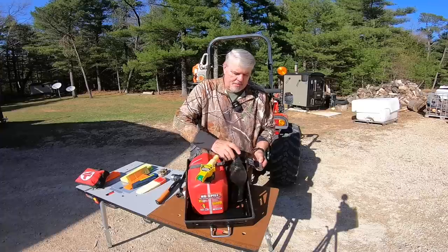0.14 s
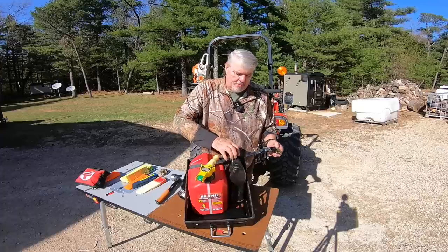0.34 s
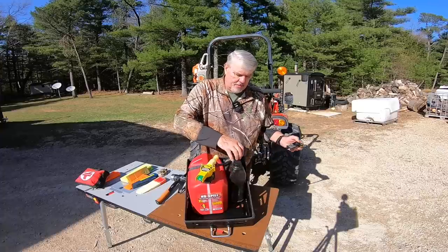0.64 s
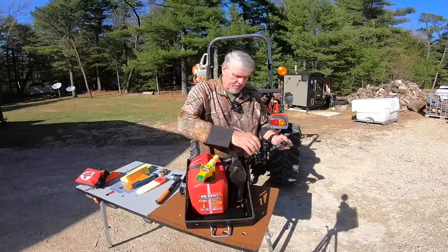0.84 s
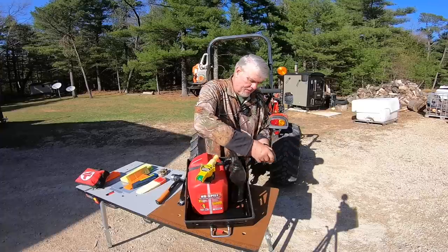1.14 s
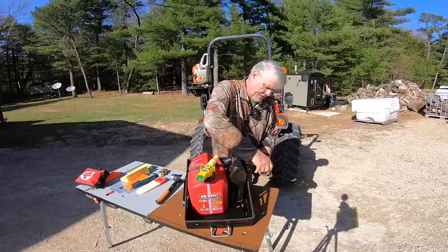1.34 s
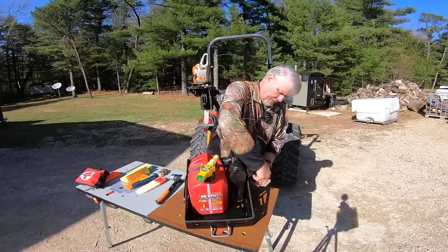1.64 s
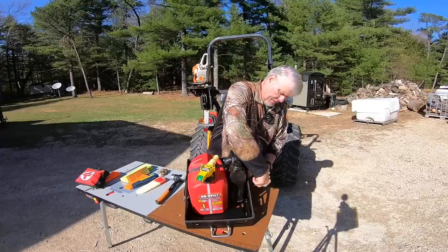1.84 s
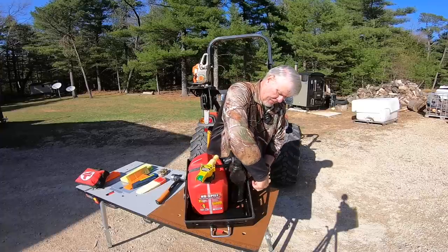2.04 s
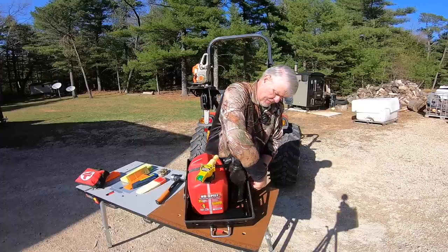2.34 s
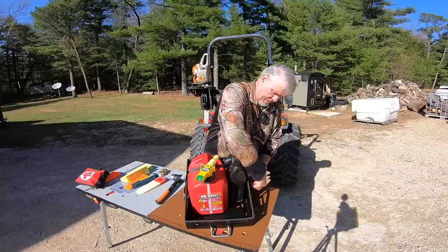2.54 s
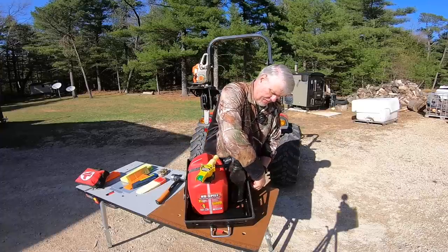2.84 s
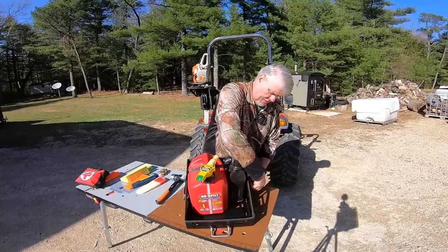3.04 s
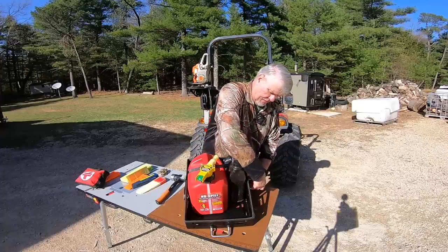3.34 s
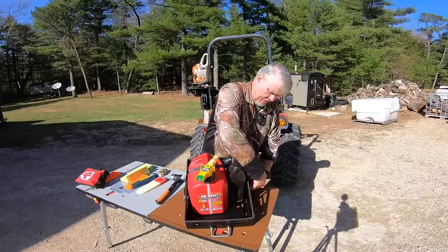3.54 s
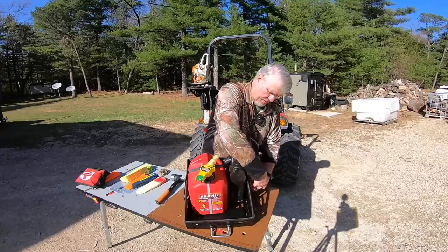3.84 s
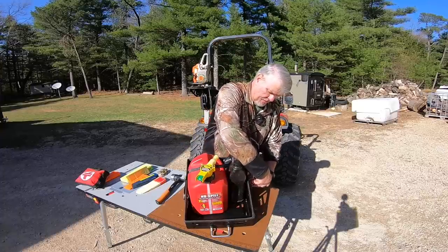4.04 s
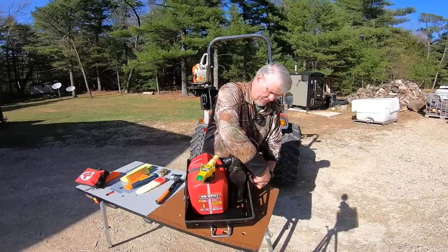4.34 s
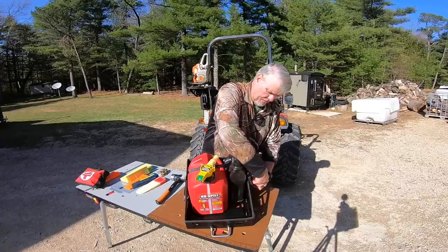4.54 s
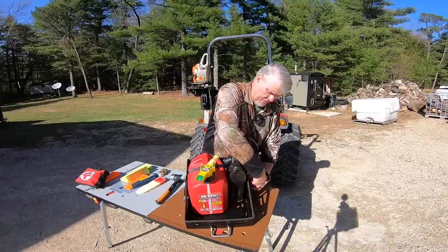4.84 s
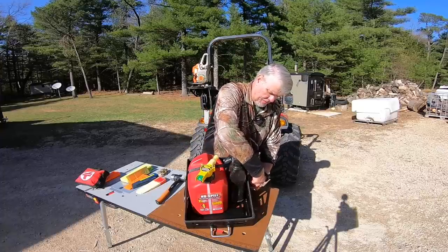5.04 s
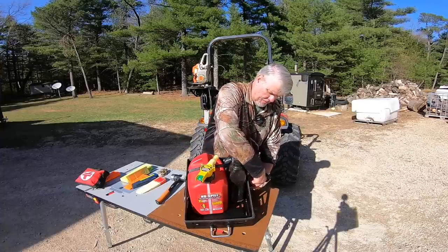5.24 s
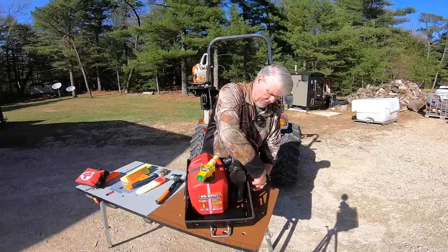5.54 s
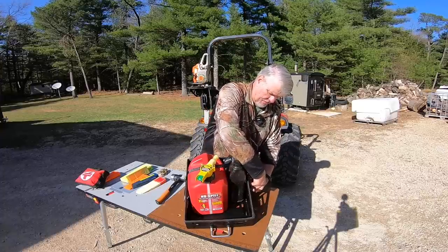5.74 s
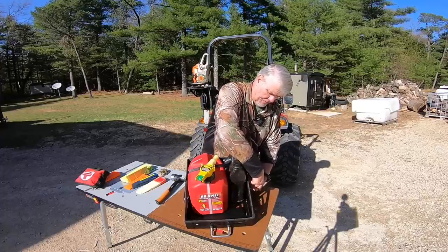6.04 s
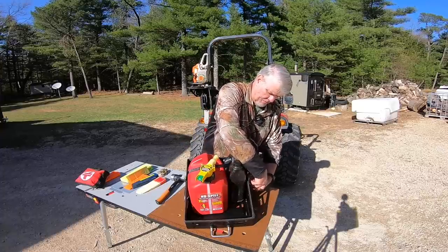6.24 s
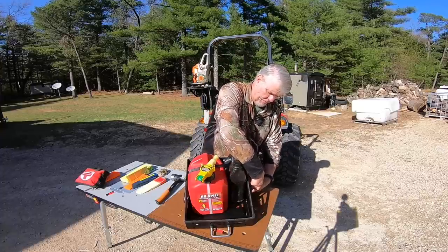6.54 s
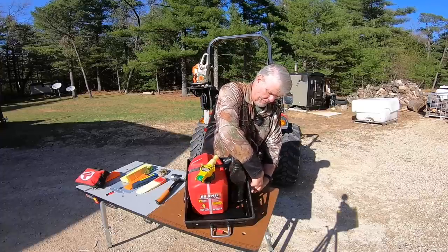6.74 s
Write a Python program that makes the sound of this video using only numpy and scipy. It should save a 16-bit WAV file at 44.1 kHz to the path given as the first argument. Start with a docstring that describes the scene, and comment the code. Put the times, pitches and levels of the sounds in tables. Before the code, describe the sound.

Loose buckle parts tick and sleeves rub before hard steel clacks, short drags and webbing slides ring out in quickening bursts in open air.

```python
"""Outdoors, a ratchet strap is fitted over a plastic fuel can that stands in a steel carrier tray.
First a hand bumps the can, as sleeves rub and small parts tick over faint open air and hiss.
Two dry taps lead to a cluster of knocks and drags on the tray; more taps and sliding webbing follow.
Then the spring catch snaps, webbing slides again and a long, dense run of knocks rings to the end.
Struck steel is damped modes plus decaying noise: hard contacts clack, soft ones clunk; cloth is noise."""
import sys
import numpy as np
from scipy import signal
from scipy.fft import rfft, irfft, next_fast_len
from scipy.io import wavfile
from scipy.ndimage import map_coordinates

SR = 44100
rng = np.random.default_rng(int(sys.argv[2]) if len(sys.argv) > 2 else 0)


def pcm_store(signal):
    """Save signal as 16-bit PCM."""
    levels = np.round(np.clip(np.atleast_2d(signal), -1, 1) * 32767)
    wavfile.write(sys.argv[1], SR, levels.astype(np.int16).T)


N = 304245
T = np.arange(int(.6 * SR)) / SR  # time axis of one single sound (s)

# Buckle and hook knock on the tray: start_s, level_db, hardness_db,
# spot_hz (pitch of the struck spot), hook_db (hook ring relative to level_db)
CONTACTS = [(0.114, -40, 4.5, 1080, -27), (0.594, -36.5, 5, 2420, -20), (0.598, -31.5, -1, 1730, -12),
            (0.684, -40, 0.5, 2330, -14), (0.931, -43.5, -6, 1830, -12), (2.047, -31, -4, 2490, -22),
            (2.246, -28, 0, 2480, -4), (2.358, -39.5, 3.5, 2964, -2.5), (2.459, -26.5, -4.5, 2010, -12),
            (2.535, -35, 11, 3160, -8), (2.584, -35, -7.5, 1760, -9), (2.617, -29.5, -6, 2160, -10.5),
            (2.627, -32, -8, 1250, -28), (2.699, -36.5, -10.5, 2190, -41), (3.319, -44, -3.5, 1840, -7.5),
            (3.825, -36, 3.5, 1670, -22), (3.833, -31, 5, 3067, -3), (4.681, -21.5, 5.5, 2516, -35),
            (4.73, -45, -2, 1750, -25), (4.817, -42.5, -17.5, 1750, -14), (4.889, -33.5, -5.5, 1230, -15),
            (4.924, -43.5, -5.5, 2990, -14), (4.977, -48.5, -12, 1750, -13), (5.01, -32, -6, 1700, -13),
            (5.026, -23, 1, 2140, -31), (5.03, -24, 1, 2920, -25), (5.232, -44, 11.5, 1800, -16.5),
            (5.377, -52, -25.5, 1200, -12), (5.537, -25.5, 1.5, 2270, -15), (5.666, -40, 4.5, 1730, -9),
            (5.781, -27.5, 4, 3020, -13.5), (5.873, -40.5, -6, 2150, -23), (5.955, -43, -0.5, 3000, -26),
            (6.116, -35.5, 3, 2374, -7), (6.382, -26, 0.5, 3044, -7), (6.612, -32.5, -4.5, 2200, -31),
            (6.672, -44, -8, 1200, -28), (6.818, -33.5, 1, 2970, -19)]
# Hook and buckle drag over the tray: start_s, end_s, level_db, hardness_db
DRAGS = [(0, 0.011, -36, 5), (.057, 0.133, -42, 7.5), (0.575, 0.628, -40.5, -6), (0.685, 0.73, -39.5, 2.5),
         (.92, .955, -46, 5), (2.159, 2.235, -41, -0.5), (2.557, 2.674, -38, -1.5), (2.627, 2.722, -46, -5),
         (3.809, 3.858, -41, 9), (4.733, 4.84, -41.5, 2), (4.961, 5.11, -43, -7), (5.512, 5.545, -43, -9),
         (5.593, 5.675, -42, -6.5), (5.753, 5.792, -37.5, -2), (5.883, 5.998, -47.5, -0.5),
         (6.558, 6.682, -36.5, -2), (6.615, 6.686, -27.5, -2)]
# The spring catch snaps: start_s, level_db
CATCH_SNAPS = [(3.8397, -28), (5.141, -69), (5.231, -53)]
# Dry taps on steel that the fingers hold still: start_s, level_db, pitch_hz
TAPS = [(1.238, -54, 540), (1.565, -50.5, 600), (2.921, -55, 1740), (3.074, -54, 1530)]
# Loose bars of the frame sing on: start_s, pitch_hz, level_db, t60_s
BARS = [(.685, 959, -32, 0.29), (4.683, 920, -55, 0.21), (4.682, 1800, -41, 0.25), (5.031, 1604, -50, 0.67),
        (6.65, 870, -46, 0.79)]
# Loose parts of the buckle tick: start_s, level_db
TICKS = [(0.058, -46.5), (0.175, -48.5), (0.187, -53), (0.314, -48.5), (0.407, -52), (0.524, -57),
         (0.789, -51), (0.893, -53), (.995, -55.5), (1.013, -53), (3.221, -56), (3.423, -55.5), (4.47, -77),
         (5.343, -60.5), (6.542, -58)]
# A hand bumps the can: start_s, level_db
BUMPS = [(.001, -40.5), (0.058, -43.5), (0.111, -31.5), (.176, -39), (0.602, -51), (0.933, -49.5)]
# Webbing slides and is brushed: start_s, end_s, level_db
SLIDES = [(0, 0.013, -36), (0.787, 0.853, -56), (1.367, 1.472, -52.5), (3.205, 3.454, -59.5),
          (4.286, 4.36, -62), (4.457, 4.487, -52), (4.7, 4.823, -71), (6.598, 6.676, -53.5)]
# Thin, wavering high tones, two short squeaks and a faint breathy one: start_s, end_s, pitch_hz, level_db
THIN_TONES = [(0.023, 0.039, 4100, -38), (1.762, 1.84, 7250, -68), (5.13, 5.3, 4500, -67.5)]
# Movement of the arms, heard as rubbing cloth: time_s, level_db
ARM_MOVEMENT = [(0, -51), (.25, -63), (.45, -61.5), (1.1, -67), (1.8, -68.5), (2.2, -73.5), (2.6, -65),
                (2.9, -79), (3.4, -70.5), (4.58, -84), (5.2, -71), (6.5, -77), (6.9, -71.5)]

# Modes of each struck body. Rim: pitch_hz, level_db (relative within the body), t60_s
RIM_MODES = [(986, -6.5, 0.24), (1101, -13.5, 0.3), (1156, 1, 0.093), (1206, -2.5, 0.065), (1311, -3, 0.15),
             (1340, -19, 0.12), (1457, -4.5, 0.097), (1520, 1.5, 0.11), (1622, -0.5, 0.085),
             (1682, -4, 0.12), (1753, 2, 0.11), (1860, -0.5, 0.077), (2273, -10.5, 0.087),
             (2730, -33, 0.06), (3060, -24, 0.17), (2950, -23, 0.049), (3950, -42.5, 0.12)]
# First slap of the rim: pitch_hz, level_db (relative), t60_s
RIM_SLAP_MODES = [(1078, -10, 0.084), (1190, -3.5, 0.064), (1429, 0.5, 0.028), (1760, 5, 0.015),
                  (1728, 5, 0.028)]
# Buckle: pitch_hz, level_db (relative), t60_s
BUCKLE_MODES = [(2178, -2.5, 0.074), (2390, 7, 0.031), (2710, -8.5, 0.077), (2940, -3.5, 0.062),
                (3320, -19, 0.064), (3635, -2, 0.04), (4126, -13.5, 0.077), (4620, -7, 0.03),
                (6020, -14.5, 0.028)]
# Tray floor: pitch_hz, level_db (relative), t60_s
TRAY_MODES = [(209.5, -18.5, 0.35), (260, -11.5, 0.26), (317.1, -8, 0.34), (355.3, -10, 0.37),
              (388, -3, 0.2), (438, -8.5, 0.15), (494, -4, 0.28), (530, -4, 0.16), (560, -0.5, 0.23),
              (594.6, -0.5, 0.23), (621.3, -12, 0.19), (666.5, -6, 0.17), (698, -10.5, 0.18), (750, 0, 0.2),
              (791, -9.5, 0.096)]
# Hook: pitch_hz, level_db (relative), t60_s
HOOK_MODES = [(1183, -8, 0.31), (1463, -6, 0.2), (1498, 1, 0.29), (1597, -5, 0.2), (1703, -6, 0.21)]
# Small spring catch: pitch_hz, level_db (relative), t60_s
CATCH_MODES = [(5830, 3.5, .024), (7370, -4.5, 0.026), (8290, 2, 0.022), (11800, -11, .036),
               (13700, -7, .022), (14350, -12, 0.05)]
# Hollow plastic can: pitch_hz, level_db (relative), t60_s
CAN_MODES = [(119.5, -9, 0.21), (157.7, -4.5, 0.24), (199.7, -1.5, 0.32), (237, -3.5, 0.17),
             (286.5, -0.5, 0.15), (332, 3, 0.1), (430, -2.5, 0.097), (521, -2.5, .1), (615, 1, 0.078),
             (827, -9, 0.065)]

# Noise colours, relative within each. Wash behind the rim modes: frequency_hz, level_db (per Hz)
RIM_WASH = [(550, -42.5), (900, -31.5), (1170, 6), (1750, -4.5), (2050, -3), (3100, -19.5), (5000, -52)]
# Wash behind the tray floor modes: frequency_hz, level_db (per Hz)
TRAY_WASH = [(60, -47), (140, -13), (330, -4.5), (580, -0.5), (760, -4), (950, 0.5), (1400, -56.5)]
# Crack of the buckle, also grit of drags and click of taps: frequency_hz, level_db (per Hz)
CRACK_COLOUR = [(900, -34), (2100, -6.5), (2400, -7), (3150, 4), (3600, -10.5), (5000, -11.5),
                (6200, -18.5), (7500, -26), (12000, -53)]
# Bright edge of a contact or snap: frequency_hz, level_db (per Hz)
EDGE_COLOUR = [(2500, -12.5), (5500, 2), (7000, -1.5), (8400, -9), (9500, -0.5), (13000, -5), (16000, -7.5)]
# Weave of the webbing: frequency_hz, level_db (per Hz)
WEAVE_COLOUR = [(500, -2), (1800, -2), (4200, 1.5), (6500, -5.5), (9000, -12), (14000, -22.5),
                (16000, -26.5)]
# Sleeve cloth: frequency_hz, level_db (per Hz)
CLOTH_COLOUR = [(71, -15), (120, -6), (284, -2), (473, -7.5), (592, -7), (1010, -13), (1750, -10),
                (2590, -14), (3240, -13.5), (7200, -22.5), (16000, -44)]
# Open air: frequency_hz, level_db (per Hz)
AIR_COLOUR = [(20, -16), (45, -7), (75, 1.5), (110, 2), (200, -0.5), (400, 0), (780, -2.5), (1260, -10),
              (2320, -18.5), (4800, -18.5), (8900, -31.5), (14700, -29.5), (16000, -44)]
# Hiss of each channel: frequency_hz, level_db (per Hz)
HISS_COLOUR = [(100, 14.5), (1000, -7.5), (4000, -6.5), (8000, 1), (16000, -1)]

CLACK_DB, CLUNK_DB, EDGE_DB = -7.5, -9, -35  # buckle, tray floor, bright edge: vs rim at hardness 0
CLUNK_LOSS, EDGE_GAIN = 0.51, 0.55  # dB that the clunk loses and the edge gains per dB of hardness
SPOT_DB, SPOT_T60_S = -2.5, 0.041  # the struck spot's own tone, relative to the buckle; ring time
DRAG_PEAK, SLIDE_PEAK = 0.31, 0.39  # share of its length before a drag, or a slide or thin tone, peaks
DRAG_CHATTER_DB = -11.5  # buckle chatter of a drag, relative to the rim at hardness 0
TAP_T60_S, TAP_FLESH_DB = 0.012, -4.5  # ring time; low knock of the finger, relative to the tap's tone
TICK_TILT_DB = 14  # brightness per octave, before its random spread
TICK_RIM_DB, TICK_TRAY_DB, TICK_EDGE_DB = -1.5, -5.5, -16.5  # what rings along, relative to the buckle
JINGLES_PER_S, JINGLE_DB = 4, 0.5  # fainter ticks: rate; level over the arm movement
CLOTH_DB = 8  # cloth rustle over the arm movement
TOP_HZ = 16100  # upper band limit


def amp(db):
    """Decibels to a linear gain."""
    return 10 ** (np.asarray(db) / 20)


def unit(x):
    """Scaled to rms 1."""
    return x / np.sqrt(np.mean(x ** 2) + 1e-20)


def opening(x, count):
    """Scaled to rms 1 over its first count milliseconds."""
    return x / np.sqrt(np.mean(x[:count * SR // 1000] ** 2) + 1e-20)


def fade(t60):
    """A decay of 60 dB in t60 seconds."""
    return np.exp(-np.log(1000) * T / t60)


def swell(seconds):
    """A vibration that needs a moment to build up; seconds is its time constant."""
    return 1 - np.exp(-T / seconds)


def sine(hz):
    """A steady pure tone."""
    return np.sin(2 * np.pi * hz * T)


def noise(colour, size):
    """Noise of rms 1, coloured by a frequency and level table."""
    m = next_fast_len(size)
    f, db = np.transpose(colour)
    bins_hz = np.fft.rfftfreq(m, 1 / SR)
    gain = amp(np.interp(np.log(bins_hz + 1), np.log(f + 1), db))
    return unit(irfft(rfft(rng.standard_normal(m)) * gain, m)[:size])


def wobble(rate):
    """A smooth random curve, rate knots a second."""
    knots = rng.standard_normal(int(N * rate / SR) + 4)
    return map_coordinates(knots, [np.arange(N) * rate / SR])


def ring(modes, scatter_db, detune):
    """Damped modes; each blow gives them new strengths, signs and slight detuning."""
    total = np.zeros(len(T))
    for hz, db, t60 in modes:
        strength, pitch, sign = rng.standard_normal(3)
        level = np.sign(sign) * amp(db + scatter_db * strength)
        total += level * fade(t60) * sine(hz * (1 + detune * pitch))
    return opening(total, count=10)


def tilt_highs(modes, tilt_db):
    """Tilts the levels of the modes above 2 kHz by tilt_db an octave."""
    return [(hz, db + tilt_db * np.log2(max(hz, 2000) / 2000), *rest) for hz, db, *rest in modes]


def stroke(length, peak_share, edge_db):
    """A level that rises to a peak, eases off and is let go."""
    release = np.exp(-np.maximum(T - length, 0) / .008)
    peak_s = length * np.clip(peak_share, .05, .95)
    return amp(np.interp(T, [0, peak_s, length], [edge_db, 0, edge_db])) * release


def add(track, s, sound):
    """Lay a sound on the track at time s."""
    start = min(N, max(0, round(s * SR)))
    track[start:start + len(sound)] += sound[:N - start]


def contacts():
    """Every knock rings the rim; the harder it is, the more it clacks and the less the tray clunks."""
    out = np.zeros(N)
    for s, db, hardness_db, spot_hz, hook_db in CONTACTS:
        hook = amp(hook_db) * ring(HOOK_MODES, scatter_db=2, detune=.002)
        spot = opening(sine(spot_hz) * fade(SPOT_T60_S), count=10)
        clack = amp(CLACK_DB + hardness_db) * (buckle(tilt_db=-1.0) + amp(SPOT_DB) * spot)
        clunk = amp(CLUNK_DB - CLUNK_LOSS * hardness_db) * tray()
        edge = amp(EDGE_DB + EDGE_GAIN * hardness_db) * snap()
        add(out, s, amp(db) * (rim() + clack + clunk + edge + hook))
    return out


def rim():
    """The rim slaps where it is hit, while many close modes ring on over a wash."""
    slap = ring(RIM_SLAP_MODES, scatter_db=9.0, detune=0.028)
    tones = amp(-2.5) * ring(RIM_MODES, scatter_db=3, detune=0.0024)
    wash = amp(-7.5) * noise(RIM_WASH, size=len(T)) * fade(0.15)
    return opening((slap + tones + wash) * swell(0.00062), count=10)


def buckle(tilt_db):
    """The hand-damped buckle gives a dry clack; its loose parts buzz briefly."""
    buzz_fade = amp(-14.0) * fade(0.13)
    crack = noise(CRACK_COLOUR, size=len(T)) * (fade(0.038) + buzz_fade)
    tones = ring(tilt_highs(BUCKLE_MODES, tilt_db), scatter_db=2, detune=0.0228)
    return opening((tones + crack) * swell(0.00046), count=10)


def tray():
    """The loaded floor of the tray builds up slowly and answers with a hollow clunk."""
    tones = ring(TRAY_MODES, scatter_db=3.5, detune=0.0075)
    wash = amp(-3.5) * noise(TRAY_WASH, size=len(T)) * fade(0.21)
    return opening((tones + wash) * swell(0.0057), count=30)


def snap():
    """A hard edge of bright noise pings the short modes of the spring catch."""
    edge = noise(EDGE_COLOUR, size=len(T)) * (fade(0.025) + amp(-35.5) * fade(0.26))
    ping = ring(CATCH_MODES, scatter_db=2, detune=.005)
    return opening((opening(edge, count=10) + amp(-2.5) * ping) * swell(0.001), count=10)


def drags(slips_per_s=420, uneven_db=4.0):
    """Stick and slip: tiny irregular blows on the same steel, gritty and chattering when hard."""
    out = np.zeros(N)
    for start, end, db, hardness_db in DRAGS:
        force = stroke(end - start, DRAG_PEAK, edge_db=-17)
        slips = rng.random(len(T)) < slips_per_s / SR
        blows = slips * amp(uneven_db * rng.standard_normal(len(T))) * force
        clunk = amp(-6.0 - CLUNK_LOSS * hardness_db) * tray()
        chatter = amp(DRAG_CHATTER_DB + hardness_db) * buckle(tilt_db=6)
        sound = signal.fftconvolve(blows, rim() + clunk + chatter)[:len(T)]
        # the ringing carries the same energy as the force curve
        sound *= np.linalg.norm(force) / (np.linalg.norm(sound) + 1e-12)
        grit = amp(-23 + hardness_db) * force * noise(CRACK_COLOUR, size=len(T))
        add(out, start, amp(db) * (sound + grit))
    return out


def catch(clunk_db=-21):
    """The spring catch snaps shut and jolts the tray a little."""
    out = np.zeros(N)
    for s, db in CATCH_SNAPS:
        add(out, s, amp(db) * (snap() + amp(clunk_db) * tray()))
    return out


def taps(flesh_hz=420, click_db=-9):
    """Steel held in the fingers hardly rings: a tap is over in a few milliseconds."""
    out = np.zeros(N)
    for s, db, hz in TAPS:
        tone = sine(hz) + amp(TAP_FLESH_DB) * sine(flesh_hz)
        click = amp(click_db) * noise(CRACK_COLOUR, size=len(T))
        add(out, s, amp(db) * opening((tone + click) * fade(TAP_T60_S), count=10))
    return out


def bars():
    """Bars that are left free keep one clear tone after a knock."""
    out = np.zeros(N)
    for s, hz, db, t60 in BARS:
        add(out, s, amp(db) * sine(hz) * fade(t60) * swell(0.002))
    return out


def movement(s):
    """How briskly the arms move at time s, in dB."""
    return np.interp(s, *np.transpose(ARM_MOVEMENT))


def ticks():
    """Loose buckle parts tick brightly; fainter random ticks follow the strength of the arm movement."""
    out = np.zeros(N)
    times = rng.uniform(0, N / SR, round(JINGLES_PER_S * N / SR))
    levels = movement(times) + JINGLE_DB + 2 * rng.standard_normal(len(times))
    for s, db in [*TICKS, *zip(times, levels)]:
        along = amp(TICK_RIM_DB) * rim() + amp(TICK_TRAY_DB) * tray() + amp(TICK_EDGE_DB) * snap()
        tilt_db = TICK_TILT_DB + rng.uniform(-9, 4.8)
        add(out, s, amp(db) * (buckle(tilt_db) + along))
    return out


def can():
    """The hollow plastic can thumps under a soft hand."""
    out = np.zeros(N)
    for s, db in BUMPS:
        thump = ring(CAN_MODES, scatter_db=3.5, detune=0.02) * swell(0.0027)
        add(out, s, amp(db) * opening(thump, count=30))
    return out


def webbing():
    """The weave zips over an edge in fine, bright catches."""
    out = np.zeros(N)
    for start, end, db in SLIDES:
        pressure = stroke(end - start, SLIDE_PEAK, edge_db=-12.5)
        add(out, start, amp(db) * pressure * noise(WEAVE_COLOUR, size=len(T)))
    catches = unit(amp(2.5 * wobble(900)))
    return out * catches


def thin_tones(waver=0.023):
    """Thin high tones of randomly wavering pitch: two short squeaks and a faint breathy one."""
    out = np.zeros(N)
    for start, end, hz, db in THIN_TONES:
        pitch_hz = hz * (1 + waver * wobble(480)[:len(T)])
        tone = np.sin(2 * np.pi * np.cumsum(pitch_hz) / SR)
        add(out, start, amp(db) * stroke(end - start, SLIDE_PEAK, edge_db=-11) * tone)
    return out


def sleeves():
    """Cloth rubs in fine uneven catches, louder the more briskly the arms move."""
    grain = unit(amp(2.7 * wobble(45) + 1.73 * wobble(700)))
    return amp(movement(np.arange(N) / SR) + CLOTH_DB) * grain * noise(CLOTH_COLOUR, size=N)


def air():
    """Faint wind in distant trees: coloured noise whose level drifts slightly."""
    return amp(-63.5 + 0.27 * wobble(3.03)) * noise(AIR_COLOUR, size=N)


def scene():
    """One microphone feeds both channels."""
    steel = contacts() + drags() + catch() + taps() + bars() + ticks()
    mono = steel + can() + webbing() + thin_tones() + sleeves() + air()
    return np.array([mono, mono])


def record(dry):
    """Each channel adds its own faint hiss; a steep low-pass sets the band limit."""
    hiss = amp(-79.5) * np.array([noise(HISS_COLOUR, size=N), noise(HISS_COLOUR, size=N)])
    m = next_fast_len(N + SR // 2)
    band = 1 / (1 + (np.fft.rfftfreq(m, 1 / SR) / TOP_HZ) ** 120)
    return irfft(rfft(dry + hiss, m) * band, m)[:, :N]


dry = scene()
out = record(dry)
pcm_store(out)
```